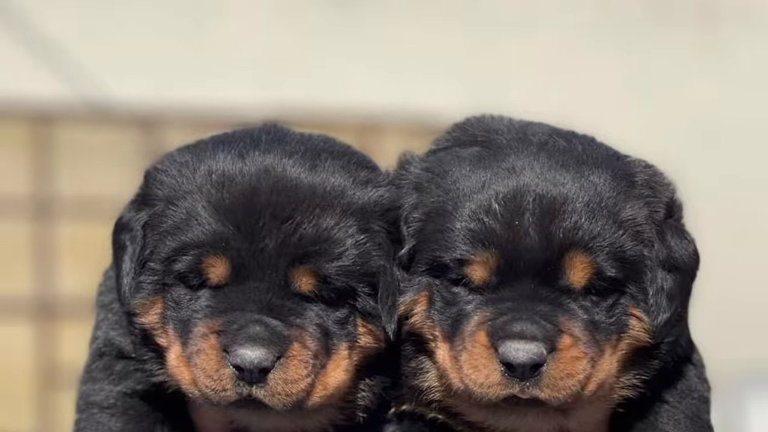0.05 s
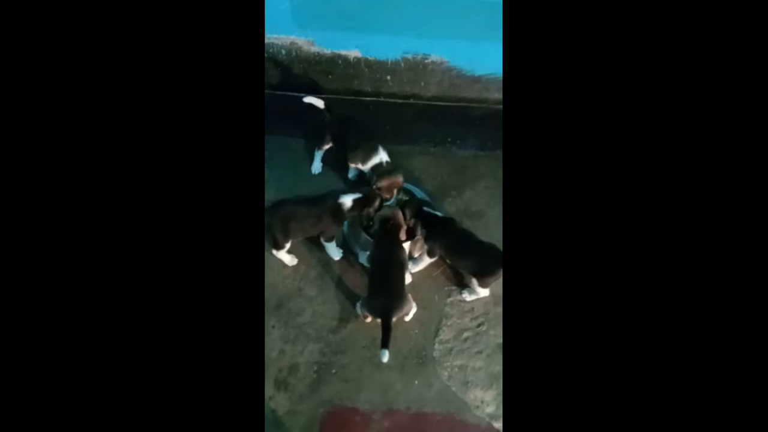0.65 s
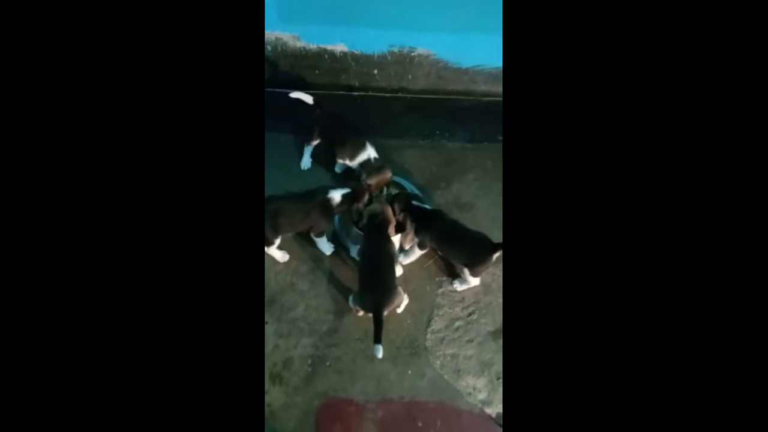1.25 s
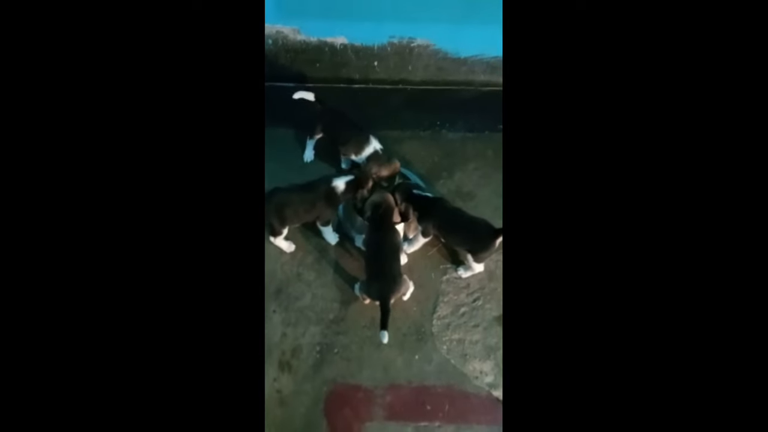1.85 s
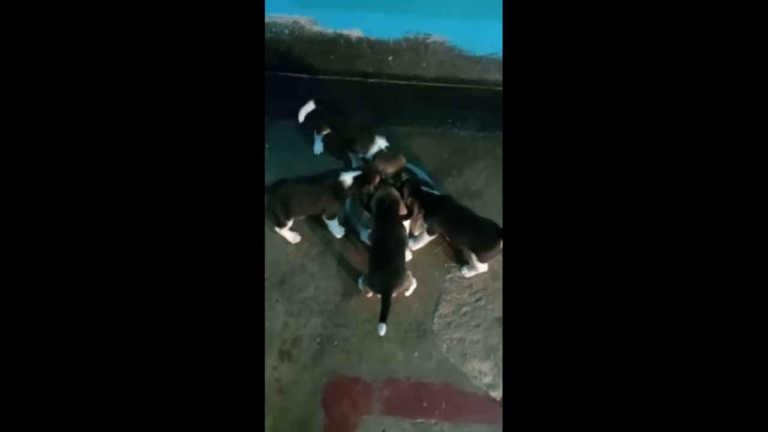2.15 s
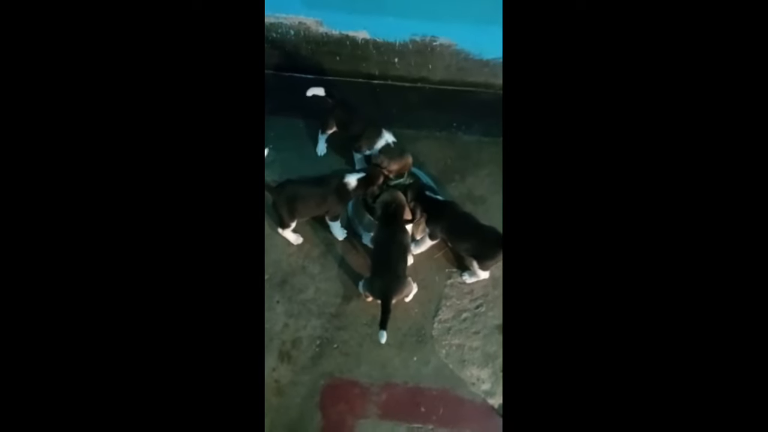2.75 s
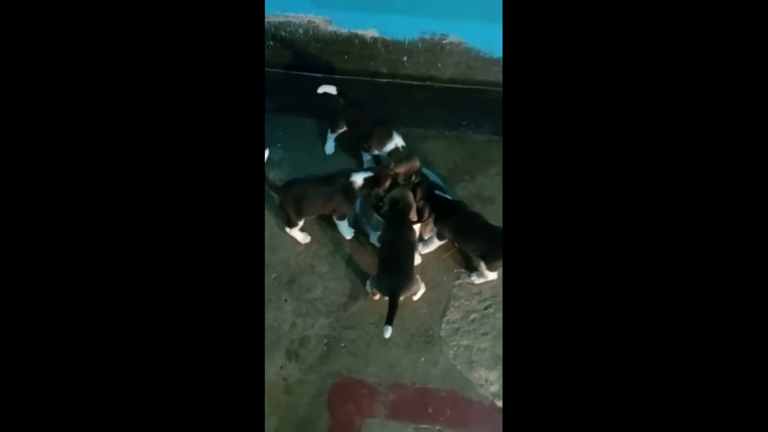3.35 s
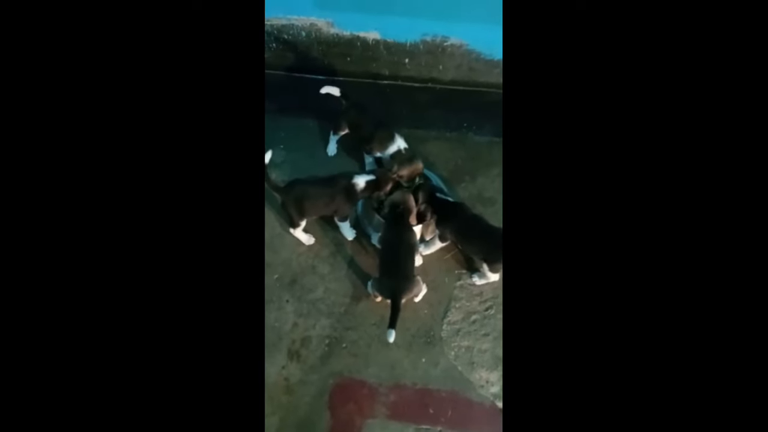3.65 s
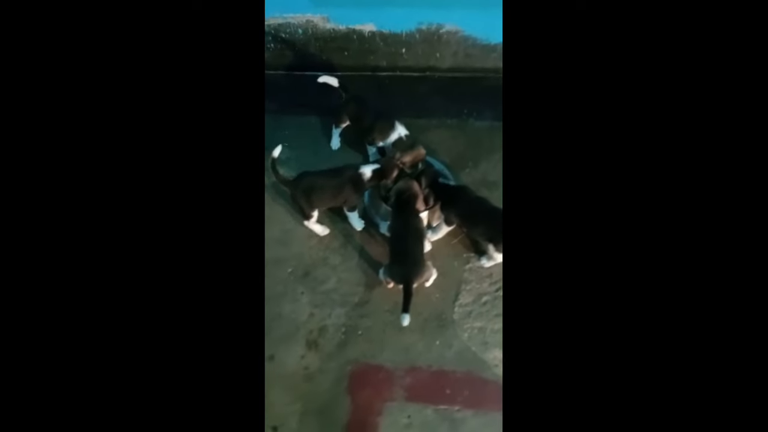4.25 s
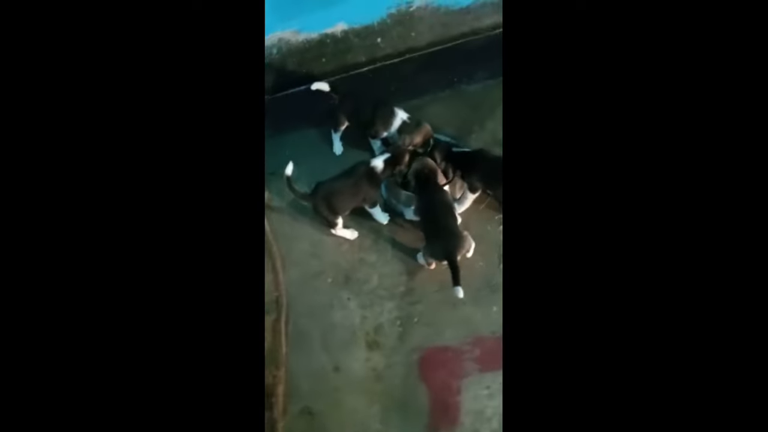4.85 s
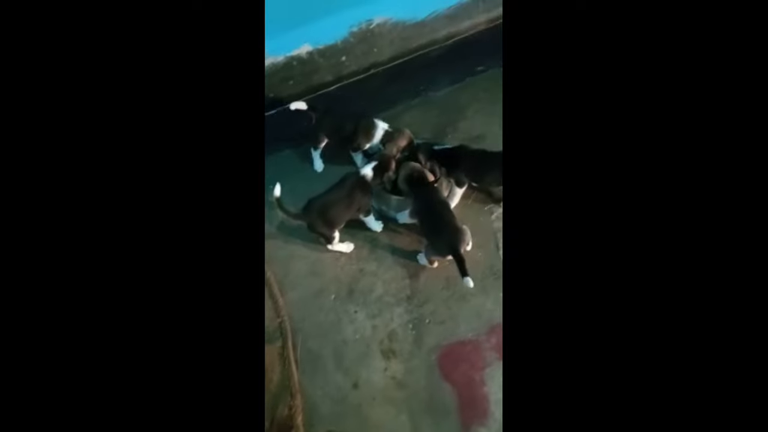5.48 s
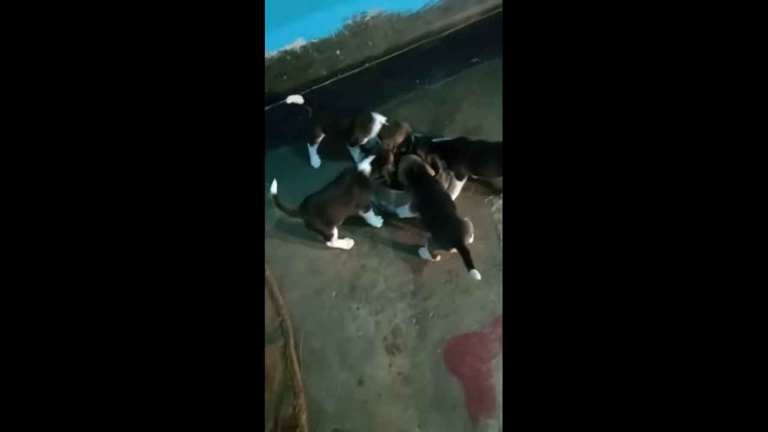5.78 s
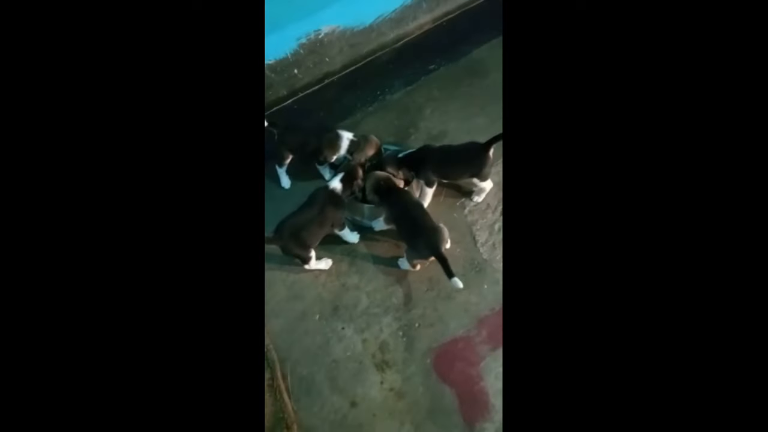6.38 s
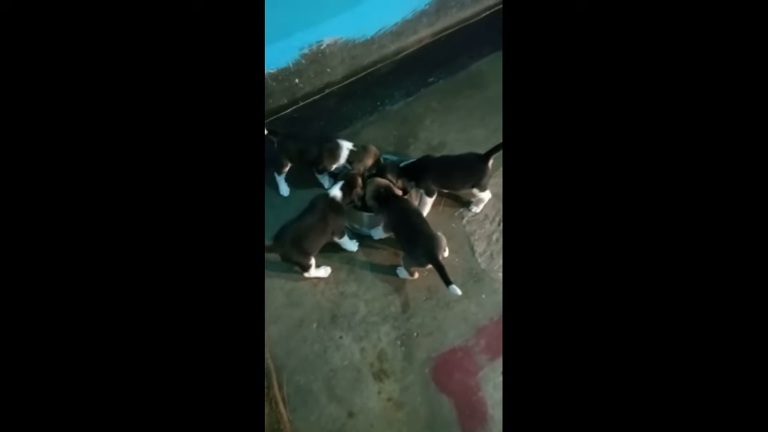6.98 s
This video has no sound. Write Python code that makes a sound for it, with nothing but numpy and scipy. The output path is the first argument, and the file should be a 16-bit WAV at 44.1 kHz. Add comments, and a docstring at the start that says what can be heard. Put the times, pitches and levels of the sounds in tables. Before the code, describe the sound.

After silence, the sound of several puppies eating wet food fades in quickly at about 0.7 seconds. Tongues lap with low plops, lips smack, saliva crackles and mouthfuls squelch in a busy, uneven stream. Paws scuff on gritty concrete, with short skids between 1 and 2 seconds and again around 4. From about 2 to 3.3 seconds the bowl is shoved along the floor with a faint, juddering groan. It also gives scattered soft, dull knocks, the clearest near 2.6 seconds. At 3.8 seconds one hard bite snaps, the loudest moment, followed by sharp smacks just after 4. The eating continues, with a thicker run of smacks and laps from 5.5 to 6 seconds, and lasts until the end at about 7 seconds. Everything sounds fairly close, with short echoes from hard walls, over a low rumble and a faint wavering hum.

```python
"""A hard-walled room with a concrete floor, where puppies crowd round one bowl of wet food.
After a silence the meal fades in: lips pop, tongues lap, spit crackles and the mash squelches, all
from small wet cavities ringing as they break open. Mouthfuls crush, and one hard bite snaps.
Paws scuff over grit, bump the bowl and shove it along until it groans.
The walls throw it all back, over a low rumble and a faint hum."""
import sys
import numpy as np
from scipy import signal
from scipy.fft import rfft, irfft
from scipy.io import wavfile
from scipy.ndimage import uniform_filter1d

SR = 44100
rng = np.random.default_rng(int(sys.argv[2]) if len(sys.argv) > 2 else 0)


def transcribe(u):
    """Save the signal u as a 16-bit wav file named by the first command-line argument.

    u: samples, shape (n,) or (channels, n), limited to [-1, 1]; the rate is SR.
    q: integer samples, one column per channel.
    """
    v = np.clip(np.atleast_2d(u).T, -1, 1)
    q = np.round(v * 32767).astype(np.int16)
    wavfile.write(sys.argv[1], SR, q)


N = 313992
TIME = np.arange(N) / SR

# shoves that drag the bowl over the floor: middle_s, level_db, half_length_s
BOWL_SHOVES = [(2.1, -61, 0.038), (2.39, -60.5, 0.14), (2.68, -60, .09), (2.84, -58.5, 0.11),
               (3.0, -57.5, 0.11), (3.28, -65, 0.13), (4.7, -67, 0.072)]


def gain_of(db):
    """Decibels to amplitude."""
    return 10 ** (np.asarray(db) / 20)


def unit_rms(x):
    """Scales to rms 1."""
    return x / np.sqrt(np.mean(x ** 2) + 1e-20)


def curve_at(points, hz):
    """A curve's value on a log-frequency axis."""
    f, value = np.transpose(points)
    return np.interp(np.log(hz + 1), np.log(f + 1), value)


def fader(rows):
    """A dB curve as a gain for every sample."""
    return gain_of(np.interp(TIME, *np.transpose(rows)))


def swells(rows):
    """Smooth rises and falls as one gain curve; where they overlap their powers add."""
    return np.sqrt(sum((gain_of(db) * np.exp(-((TIME - s) / half_s) ** 2)) ** 2 for s, db, half_s in rows))


def burst(t, rise_s, length_s):
    """An envelope that rises quickly, holds and falls."""
    return (1 - np.exp(-t / rise_s)) * np.exp(-(t / length_s) ** 2)


def add(mix, s, sound):
    """Mixes a sound in at time s."""
    part = mix[max(round(s * SR), 0):][:len(sound)]
    part += sound[:len(part)]


def coloured(x, colour):
    """Filters x by an EQ curve."""
    return irfft(rfft(x) * gain_of(curve_at(colour, np.fft.rfftfreq(len(x), 1 / SR))), len(x))


def noise(colour):
    """Noise of rms 1, shaped by an EQ curve."""
    return unit_rms(coloured(rng.standard_normal(N), colour))


def grainy_noise(samples, grain_db, grain_samples):
    """White noise whose level jumps about in tiny lumps."""
    white, lumps = rng.standard_normal((2, samples))
    return white * gain_of(grain_db * unit_rms(uniform_filter1d(lumps, size=grain_samples)))


def drone(hz, width_hz, steady=0.44):
    """A tone that wavers, faster the wider it is; steady (0-1) evens out its strength."""
    resonance = 1 + ((np.fft.rfftfreq(N, 1 / SR) - hz) / width_hz) ** 2
    tone = signal.hilbert(irfft(rfft(rng.standard_normal(N)) / resonance, N))
    return unit_rms(tone.real / (abs(tone) + 0.38 * tone.real.std()) ** steady)


def pop(hz, ring_ms, glide):
    """A wet film breaks: a small cavity swells, rings and dies while its pitch slides."""
    t = np.arange(1024) / SR
    age = t / (max(ring_ms, .08) / 1000)
    pitch = hz * (1 + glide * (np.tanh(age / 2) - .5))
    return age * np.exp(1 - age) * np.sin(2 * np.pi * np.cumsum(pitch) / SR)


def walls(x, early_db, late_db, early_s=0.0077):
    """Direct sound, a quick cluster of floor and wall echoes, and a longer tail."""
    # the room's decay: frequency_hz, t60_s
    decay_times = [(200, 0.35), (1000, 0.32), (3000, 0.39), (8000, 0.32), (15000, 0.08)]
    t = np.arange(SR * 3 // 4) / SR
    taps = rng.choice([-1., 1.], (2, len(t))) * (rng.random((2, len(t))) < 1 / 10) * (t > .002)
    early = taps[0] * np.exp(-t / early_s)
    hz, frame_s, bands = signal.stft(taps[1] * (1 - np.exp(-t / 0.0076)), SR, nperseg=256)
    decay = gain_of(-60 * frame_s / curve_at(decay_times, hz)[:, None])
    late = signal.istft(bands * decay, SR, nperseg=256)[1][:len(t)]
    echo = gain_of(early_db) * early / np.linalg.norm(early)
    echo += gain_of(late_db) * late / np.linalg.norm(late)
    return x + signal.fftconvolve(x, echo)[:len(x)]


def room_tone(rumble_db=-52, heave_db=-6, boom_db=-3, rest_db=-60, start_s=0.66, rise_s=.3):
    """A low rumble that heaves with each swell of a narrow boom, and a wavering hum; all ease in."""
    # swells of the boom: middle_s, level_db, half_length_s
    booms = [(1.07, -44, 0.03), (1.75, -43, 0.069), (2.93, -43, 0.124), (5.25, -51.5, 0.53)]
    # EQ of the rumble: frequency_hz, level_db
    rumble_colour = [(20, -33), (36, -32), (48, -7), (75, -7), (100, -9.5), (125, -1), (150, -10.5),
                     (210, 1), (245, 3.5), (300, -5), (450, -12), (800, -26), (2000, -44), (5000, -49)]
    # fader on the deepest rumble: time_s, level_db
    deep_levels = [(.8, -65.5), (5, -61.5), (7.12, -59.5)]
    # EQ of the deepest rumble: frequency_hz, level_db
    deep_colour = [(25, -36), (42, -4), (52, 8.5), (90, 4.5), (130, 1), (220, -48.5)]
    # the hum creeping up: time_s, level_db
    hum_levels = [(0.7, -58), (7.12, -53.5)]
    swell = swells(booms)
    rumble = np.hypot(gain_of(rumble_db), gain_of(heave_db) * swell) * noise(rumble_colour)
    deep = fader(deep_levels) * noise(deep_colour)
    boom = np.hypot(gain_of(rest_db), gain_of(boom_db) * swell) * drone(hz=173.0, width_hz=5.2)
    hum = fader(hum_levels) * drone(hz=338.2, width_hz=11.0)
    return np.clip((TIME - start_s) / rise_s, 0, 1) * (rumble + deep + boom + hum)


def scuffing(dull_db=-8, firm_db=-63):
    """Grit rolls under paws and bowl: a grainy hiss that brightens as they press harder."""
    # paws shuffling, settling as the meal goes on: time_s, level_db
    shuffle = [(.72, -70.5), (4.1, -74), (7.12, -77.5)]
    # EQ of grit on concrete: frequency_hz, level_db
    grit_colour = [(200, -16), (700, -0.5), (2000, 18), (4000, 8), (5200, -3.5), (6500, -7), (8000, 7.5),
                   (9500, -10.5), (12500, -28.5), (15500, -1)]
    grit = grainy_noise(N, grain_db=4, grain_samples=30)
    hiss = coloured(walls(grit, early_db=-7.5, late_db=-8), grit_colour)
    treble = signal.sosfilt(signal.butter(4, 5000, "high", fs=SR, output="sos"), hiss)
    soft = coloured(hiss, [(8500, 0), (10500, dull_db)])
    push = np.hypot(fader(shuffle), swells(BOWL_SHOVES))
    pressure = np.clip(push / gain_of(firm_db), 0, 1)
    return push * (soft + pressure * (hiss - soft)) / treble.std()


def squelch(low_hz, high_hz, per_s, cycles, spread_db, tilt_db, early_db, pitches=30):
    """Tiny pops of all sizes from three mouths, each with its own echoes, held at an even level."""
    mouths = np.zeros((3, N))
    for k, hz in enumerate(np.geomspace(low_hz, high_hz, pitches)):
        strengths = gain_of(spread_db * np.minimum(rng.exponential(1, N), 3))
        hits = strengths * (rng.random(N) < per_s / pitches / SR)
        grain = pop(hz, 1000 * cycles * rng.uniform(0.63, 1.58) / hz, glide=rng.uniform(-0.39, 0.17))
        mouths[k % 3] += gain_of(tilt_db * np.log2(hz / low_hz)) * signal.oaconvolve(hits, grain)[:N]
    wet = sum(walls(mouth, early_db, late_db=-3) for mouth in mouths)
    return wet / np.sqrt(abs(uniform_filter1d(wet ** 2, size=8000)) + 1e-12)


def chewing(slurp_db=0.1, crackle_db=-4, fizz_db=-23, usual_db=-52, treble_power=1.02):
    """A bed of low slurps, higher crackles and fizzing saliva that rides the puppies' appetite."""
    # how eagerly they eat: time_s, level_db
    appetite = [(.72, -61), (1.0, -52), (1.58, -54.5), (1.85, -50.5), (2.17, -52), (2.4, -48), (2.65, -55),
                (2.98, -46.5), (3.25, -53.5), (4.75, -52), (5.12, -56), (5.6, -50.5), (6.2, -55.5),
                (6.6, -55), (6.85, -50.5), (7.12, -53)]
    slurps = squelch(401, 1185, per_s=600, cycles=0.79, spread_db=0.5, tilt_db=2, early_db=-.5)
    crackles = squelch(1292, 3460, per_s=220, cycles=0.82, spread_db=3.5, tilt_db=-5.5, early_db=-1.5)
    fizz = squelch(4320, 14000, per_s=50, cycles=1.5, spread_db=4, tilt_db=-6.5, early_db=-4, pitches=15)
    eager = fader(appetite) / gain_of(usual_db)
    treble = gain_of(crackle_db) * crackles + gain_of(fizz_db) * fizz
    return gain_of(usual_db) * (gain_of(slurp_db) * eager * slurps + eager ** treble_power * treble)


def laps(gain_db=-8, cycles=0.91, spread_octaves=0.61, length_s=.04, plops=9):
    """A tongue stroke is a dying cluster of low plops."""
    # tongues plunging into the mash: start_s, level_db, pitch_hz
    strokes = [(0.822, -37, 690), (1.081, -38, 870), (1.344, -36.5, 784), (1.73, -33.5, 583),
               (1.943, -28, 1100), (1.984, -44, 665), (2.214, -34, 1110), (2.484, -37.5, 706),
               (3.66, -39, 1110), (4.988, -40, 1170), (5.359, -39, 726), (5.599, -32, 1010),
               (5.666, -38, 1250), (5.868, -36.5, 585), (5.951, -30, 990), (6.208, -37, 1190),
               (6.357, -39.5, 960), (6.472, -32.5, 824), (6.509, -36.5, 850), (6.924, -34, 674),
               (7.099, -34.5, 970)]
    out = np.zeros(N)
    for s, db, hz in strokes:
        stroke = np.zeros(SR // 2)
        for k, (when, size, slide) in enumerate(rng.uniform(-0.978, 1, (plops, 3))):
            age = k / plops
            pitch = hz * 2 ** (spread_octaves * size)
            plop = pop(pitch, 1000 * cycles / pitch, glide=1.2 * slide)
            add(stroke, length_s * age * (1 + when / plops), gain_of(-9 * age) * plop)
        add(out, s, gain_of(db + gain_db) * walls(stroke, early_db=4, late_db=0.5))
    return out


def smacks(rows, gain_db, ring_ms, early_db, late_db, after_db, spit_db, dry_share,
           peel_db=-15, peel_s=.003, after_s=0.014, glide=0.074, open_db=-35):
    """Lips peel, part with a pop and a tick of spit, and the saliva lets go in weaker pops."""
    out = np.zeros(N)
    for (s, db, hz), chance in zip(rows, rng.uniform(-1, 1, (len(rows), 3, 3))):
        smack = np.zeros(SR // 2)
        slides = glide * chance[:, 2]
        tick = gain_of(spit_db) * pop(hz=7600, ring_ms=0.23, glide=slides[2])
        add(smack, 0, gain_of(peel_db) * pop(hz, ring_ms, slides[1]))
        add(smack, peel_s, pop(hz, ring_ms, slides[0]) + tick)
        for when, size, slide in chance:
            after_pop = pop(hz * 1.24 ** size, ring_ms / 2, glide * slide)
            add(smack, peel_s + after_s * (1 + when), gain_of(after_db) * after_pop)
        drier_db = dry_share * max(db - open_db, 0)  # loud smacks leave an open mouth: less echo
        add(out, s - peel_s, gain_of(db + gain_db) * walls(smack, early_db - drier_db, late_db - drier_db))
    return out


def lips():
    """Wet smacks, each ringing at the resonance of a mouth."""
    # lips and tongues parting: start_s, level_db, pitch_hz
    partings = [(0.8445, -36.5, 1330), (1.0582, -40, 1720), (1.0837, -35, 1240), (1.2193, -43, 3020),
                (1.5075, -38.5, 1850), (1.7764, -40, 1900), (1.8217, -40, 1220), (2.2045, -45, 2170),
                (2.2232, -50, 1430), (2.5751, -33, 1490), (2.803, -39.5, 2400), (3.019, -37.5, 1310),
                (3.037, -41, 2600), (3.0837, -33.5, 1590), (3.2181, -41.5, 2700), (3.3413, -36.5, 1360),
                (3.3551, -38.5, 2840), (3.3874, -35.5, 1480), (3.41, -39.5, 2930), (3.4857, -44, 2910),
                (3.5317, -35, 3110), (3.579, -39.5, 1850), (4.0086, -31, 2680), (4.0865, -34.5, 3300),
                (4.0952, -26.5, 1980), (4.875, -39, 2470), (4.9074, -37, 1300), (4.9863, -34.5, 1210),
                (5.1697, -34, 2320), (5.475, -28.5, 1590), (5.5148, -34.5, 2500), (5.5527, -29.5, 2140),
                (5.6894, -41, 2220), (5.8126, -46, 3380), (5.8488, -32.5, 2730), (5.889, -34, 1540),
                (5.9675, -35.5, 3240), (6.0626, -39, 2060), (6.4424, -42, 3650), (6.4587, -40, 2180),
                (6.6379, -43.5, 2180), (6.6787, -32.5, 2690), (6.767, -35.5, 1470)]
    return smacks(partings, gain_db=1.2, ring_ms=0.57, early_db=0, late_db=-1.5,
                  after_db=-11, spit_db=-23, dry_share=0.41)


def spit(gain_db=1, cycles=1.62, glide=0.097):
    """Bubbles of spit ring for a few cycles, high and crisp."""
    # single bubbles bursting: start_s, level_db, pitch_hz
    bubbles = [(0.8601, -40.5, 3840), (1.0598, -38.5, 3860), (1.228, -48, 4150), (1.5975, -47.5, 8000),
               (2.213, -45, 6800), (2.55, -46, 7940), (3.5626, -50, 7700), (3.781, -39.5, 6800),
               (4.083, -44, 5040), (4.62, -47, 7100), (4.862, -49, 7000), (4.911, -36, 3210),
               (5.181, -36, 3360), (5.3541, -62, 9500), (5.882, -48, 14500), (6.0395, -49, 7360),
               (6.3539, -54, 7600), (6.674, -52, 13300), (6.6792, -45, 6700), (6.9211, -52, 14500),
               (6.959, -48, 4270)]
    out = np.zeros(N)
    for s, db, hz in bubbles:
        add(out, s, gain_of(db + gain_db) * pop(hz, 1000 * cycles / hz, glide))
    return walls(out, early_db=-3.5, late_db=-3)


def scrapes(gain_db=-2, rise_s=0.00089, bright_hz=9000):
    """A claw or the bowl's foot catches on the floor and skids: a burst of grit."""
    # short skids: start_s, level_db, length_s, brightness_db
    skids = [(0.975, -46, 0.046, -10), (1.055, -45, 0.031, -5), (1.18, -54, 0.026, -2),
             (1.332, -57.5, 0.062, -26), (1.389, -65, 0.089, 3), (1.711, -47.5, 0.013, 3.5),
             (1.935, -46, 0.079, 5), (3.54, -49, 0.013, -3), (3.777, -42, 0.014, 2), (4.084, -53, 0.027, 5),
             (4.3, -55, 0.034, -3), (4.343, -54, 0.032, 4)]
    # EQ of a skid: frequency_hz, level_db
    skid_colour = [(400, -10), (2000, 8.5), (4500, 1.5), (6200, -8.5), (8000, 1.5), (10000, -14.5),
                   (12500, -17.5), (15500, -12)]
    out, t = np.zeros(N), np.arange(8192) / SR
    for s, db, length_s, bright_db in skids:
        colour = [(hz, band_db + bright_db * (hz > bright_hz)) for hz, band_db in skid_colour]
        grit = coloured(grainy_noise(len(t), grain_db=4, grain_samples=40), colour)
        add(out, s, gain_of(db + gain_db) * burst(t, rise_s, length_s) * unit_rms(grit))
    return walls(out, early_db=-2, late_db=-1.5)


def mouthfuls(gain_db=1, length_s=0.023, rise_s=0.0012):
    """Wet food gives way all at once: a short, lumpy crush."""
    # jaws squeezing the food: start_s, level_db
    squeezes = [(0.987, -49.5), (1.395, -46.5), (1.815, -45.5), (1.985, -41), (2.201, -42.5),
                (3.065, -45.5), (3.638, -52), (3.895, -48), (4.34, -47), (4.58, -51), (4.691, -59),
                (4.9, -44), (4.982, -48.5), (5.329, -51), (5.686, -44.5), (5.952, -54), (6.04, -57),
                (6.353, -47.5), (6.636, -49.5), (6.865, -55), (6.923, -46), (6.972, -50)]
    # EQ of the crush: frequency_hz, level_db
    crush_colour = [(300, -4), (900, 3.5), (1500, 2.5), (2400, 0.5), (3300, -8), (4500, -17.5), (6200, -38),
                    (8000, -18.5), (11000, -55)]
    out, t = np.zeros(N), np.arange(8192) / SR
    for s, db in squeezes:
        crush = coloured(grainy_noise(len(t), grain_db=5, grain_samples=50), crush_colour)
        add(out, s, gain_of(db + gain_db) * burst(t, rise_s, length_s) * unit_rms(crush))
    return walls(out, early_db=-3.5, late_db=-4)


def bowl_bumps(gain_db=-4, hz=235, ring_ms=4):
    """The jostled bowl gives soft, dull knocks."""
    # paws and bodies hitting the bowl: start_s, level_db
    knocks = [(1.711, -44), (2.57, -33), (2.871, -41), (3.49, -43), (3.801, -38), (4.771, -36.5),
              (5.041, -35.5), (6.019, -39.5)]
    out = np.zeros(N)
    for s, db in knocks:
        add(out, s, gain_of(db + gain_db) * pop(hz * rng.uniform(0.91, 1.097), ring_ms, glide=0))
    return walls(out, early_db=-1, late_db=-2)


def bowl_groan(note_db=5, judder_db=8):
    """Pushed hard across the floor, the bowl judders and sounds a rough note."""
    # EQ of the judder: frequency_hz, level_db
    judder_colour = [(60, -36), (110, -1), (135, 3), (200, -6.5), (260, -3), (400, -13.5), (900, -35)]
    push = swells(BOWL_SHOVES)
    note = gain_of(note_db) * push ** 2 / push.max() * drone(hz=805, width_hz=18)
    return note + gain_of(judder_db) * push * noise(judder_colour)


def bite():
    """One hard bite: a quick run of short, sharp smacks."""
    # snaps within the bite: start_s, level_db, pitch_hz
    snaps = [(3.7745, -26, 2740), (3.7787, -17.5, 1820), (3.783, -23, 1590), (3.795, -24, 1860),
             (3.8038, -31, 1900)]
    return smacks(snaps, gain_db=-0.5, ring_ms=0.39, early_db=-1.5, late_db=-4.5,
                  after_db=-18, spit_db=-26, dry_share=0)


def scene():
    """All the mouths at the bowl, and the place around them, in mono."""
    mouths = lips() + bite() + laps() + mouthfuls() + spit() + chewing()
    return (mouths + scrapes() + scuffing() + bowl_groan() + bowl_bumps() + room_tone())[None]


def record(dry, start_s=0.711, fade_s=0.049, cutoff_hz=15650):
    """Silence, then a quick fade in; a steep low-pass trims the very top."""
    faded = dry * np.clip((TIME - start_s) / fade_s, 0, 1)
    lowpass = signal.firwin(511, cutoff_hz, window=("kaiser", 9), fs=SR)
    return signal.oaconvolve(faded, lowpass[None], "same")


dry = scene()
out = record(dry)
transcribe(out)
```